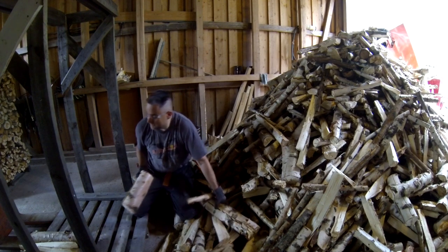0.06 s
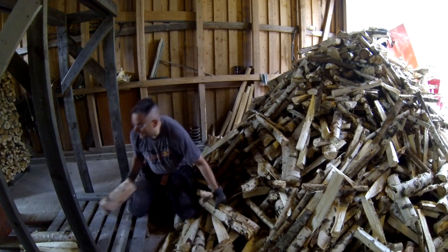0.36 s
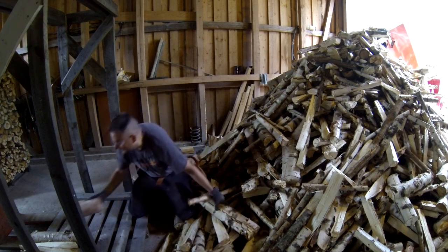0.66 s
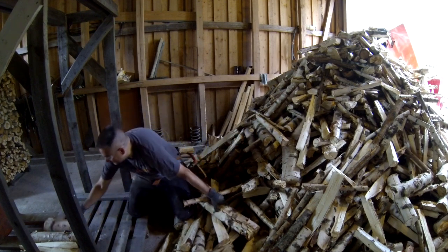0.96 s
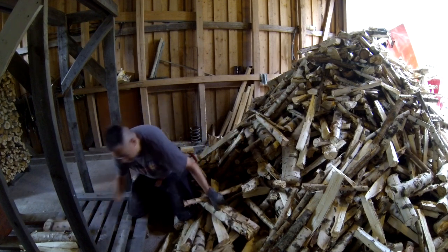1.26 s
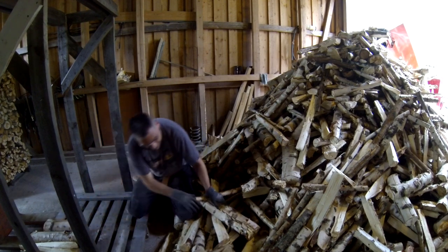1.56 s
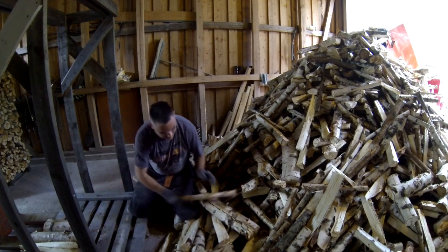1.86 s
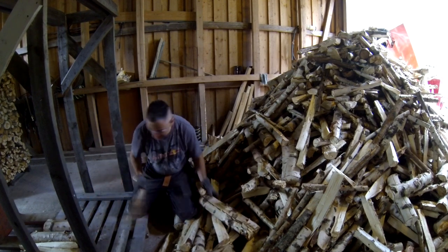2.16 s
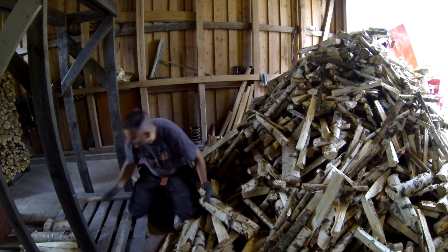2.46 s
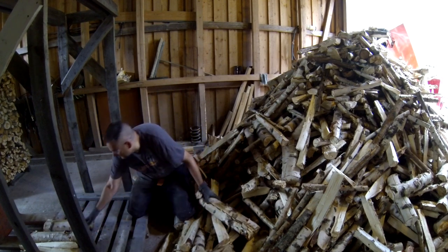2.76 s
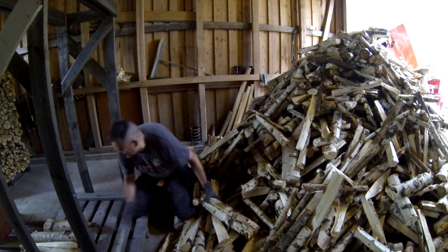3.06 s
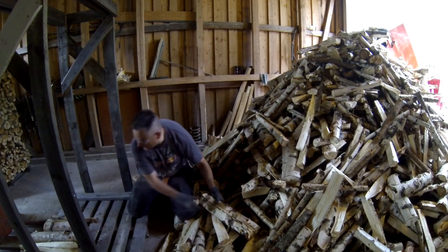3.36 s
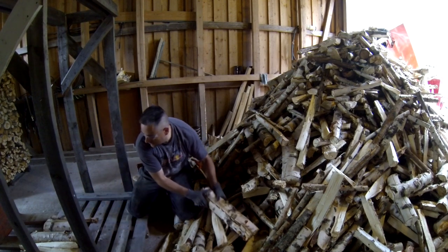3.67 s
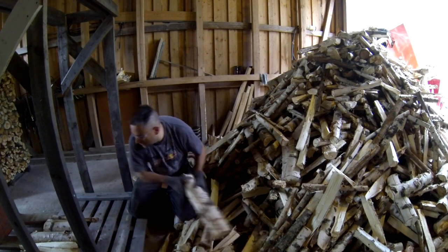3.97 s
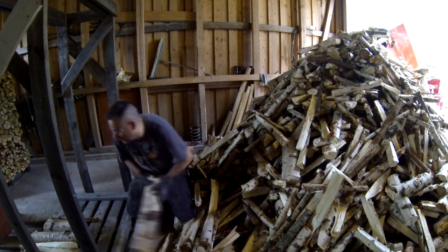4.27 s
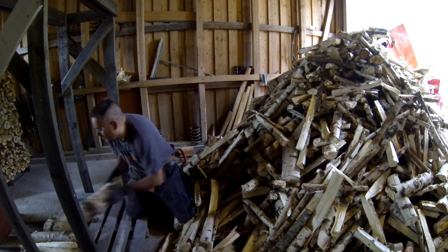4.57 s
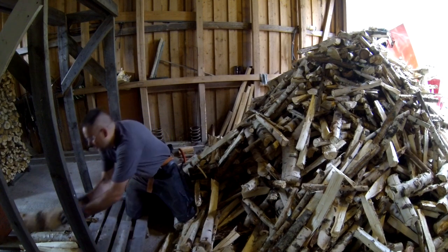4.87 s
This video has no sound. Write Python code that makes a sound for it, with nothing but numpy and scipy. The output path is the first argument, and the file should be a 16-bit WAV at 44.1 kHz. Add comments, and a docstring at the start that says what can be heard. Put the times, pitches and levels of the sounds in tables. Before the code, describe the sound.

In a wooden shed with a short reverberation, pieces of firewood knock against each other as they are laid on a pallet. The first heavy clunk booms and rattles briefly; after a pause with faint scrapes and taps come two more solid knocks close together, then a brighter clack with crackling bark. Gloves and bark rub quietly between the blows, heard over a very faint low hum of air.

```python
"""Stacking firewood in a shed

Split logs are taken from a heap and stacked on a wooden pallet. Each impact excites the damped
modes of a log and of the pallet booming under it, and crushes bark at the contact; two logs rock
to rest. Wood and gloves rub between the blows, and a few splinters snap. The plank shed answers
with echoes and reverberation, over a faint steady background."""
import sys
import numpy as np
from scipy import signal
from scipy.fft import rfft, irfft
from scipy.io import wavfile
from scipy.ndimage import uniform_filter1d

SR = 44100
rng = np.random.default_rng(int(sys.argv[2]) if len(sys.argv) > 2 else 0)


def int16_out(signal):
    """Quantize to a 16-bit WAV file."""
    q = np.round(np.clip(np.atleast_2d(signal).T, -1, 1) * 32767)
    wavfile.write(sys.argv[1], SR, q.astype(np.int16))


N = 221028
T = np.arange(SR) / SR  # t/s over the second that follows an onset


def amp(db):
    """Amplitude ratio of a level in decibels."""
    return 10 ** (np.asarray(db) / 20)


def unit(x):
    """Normalisation to rms 1."""
    return x / np.sqrt(np.mean(x ** 2) + 1e-20)


def interpolate(points, hz):
    """Linear interpolation on a logarithmic frequency axis."""
    f, value = np.transpose(points)
    return np.interp(np.log(hz + 1), np.log(f + 1), value)


def add(mix, t, sound):
    """Superposition of a sound at time t/s, which may lie before the start."""
    at = round(t * SR)
    sound = sound[max(-at, 0):]
    part = mix[max(at, 0):][:len(sound)]
    part += sound[:len(part)]


def colour(noise, spectrum):
    """Spectral shaping by (f/Hz, relative level/dB) points, at rms 1."""
    gain = amp(interpolate(spectrum, np.fft.rfftfreq(len(noise), 1 / SR)))
    return unit(irfft(rfft(noise) * gain, len(noise)))


def grains(per_s, spread_db):
    """Shot noise: one second of impulses of uneven strength at random moments."""
    strength = amp(spread_db * np.minimum(rng.exponential(1, SR), 4))
    return rng.standard_normal(SR) * strength * (rng.random(SR) < per_s / SR)


# spectrum of the background air: (f/Hz, relative level/dB)
AIR_SPECTRUM = [(20, 5.5), (42, -1), (57, 10.5), (80, 1.5), (150, -2), (300, -5.5), (600, -6), (850, -2.5),
                (1300, -14), (2200, -18.5), (3000, -18), (4800, -24.5), (8200, -26), (9000, -30),
                (13500, -32), (15500, -44)]
# a low hum and a faint whine: (f/Hz, level/dB)
STEADY_TONES = [(57.3, -60), (10750, -98.5)]
def background(air_db=-57, waver_hz=0.5):
    """Stationary noise, plus tones that waver by slow random frequency modulation."""
    drift = waver_hz * colour(rng.standard_normal(N), [(6, -4.0), (30, -62), (200, -120)])
    tones = sum(amp(db) * unit(np.sin(2 * np.pi * np.cumsum(hz + drift) / SR))
                for hz, db in STEADY_TONES)
    return amp(air_db) * colour(rng.standard_normal(N), AIR_SPECTRUM) + tones


# reverberation time of the shed: (f/Hz, T60/s)
SHED_DECAY = [(100, 0.746), (190, 0.54), (290, 0.66), (420, 0.61), (700, 0.47), (1840, 0.51), (4850, 0.39),
              (11000, 0.39)]
# early reflections off floor and walls: (delay/s, relative signed gain)
REFLECTIONS = [(.0062, 0.44), (0.018, -0.087), (0.0216, 0.19), (0.028, -0.03), (0.0477, .2), (0.053, 0.19)]
def in_shed(sound, tail_db, build_s=0.0037, echo_gain=0.3):
    """Convolution with a room impulse response: direct path, early reflections and diffuse tail."""
    hz, t, spectra = signal.stft(grains(5000, 0.91), SR, nperseg=1024)
    decay = amp(-60 * t / interpolate(SHED_DECAY, hz)[:, None])
    spectrum = rfft(signal.istft(spectra * decay, SR, nperseg=1024)[1][:SR])
    spectrum /= np.sqrt(uniform_filter1d(abs(spectrum) ** 2, size=70) + 1e-20)  # equal energy per Hz
    build_up = 1 - np.exp(-(T / build_s) ** 2)
    fade_out = np.minimum(1, 2 * (1 - T)) ** 2
    tail = irfft(spectrum, SR) * build_up * fade_out
    response = amp(tail_db) * tail / np.linalg.norm(tail)
    response[0] += 1
    for delay, gain in REFLECTIONS:
        response[round(delay * SR)] += echo_gain * gain
    return signal.fftconvolve(sound, response)


def ring(modes, contact_hz, radiate_hz, sign=1):
    """Sum of damped modes, peak 1: a soft contact dulls the high ones; slow motion radiates poorly."""
    motion = sum(sign ** k * amp(db - 60 * T / t60) * np.sin(2 * np.pi * hz * T)
                 for k, (hz, db, t60) in enumerate(modes))
    motion = signal.sosfilt(signal.butter(2, contact_hz, fs=SR, output="sos"), motion)
    sound = signal.sosfilt(signal.butter(2, radiate_hz, "high", fs=SR, output="sos"), motion)
    return sound / abs(sound).max()


# modes of each piece of wood and of the logs already stacked: (f/Hz, relative level/dB, T60/s)
WOOD_MODES = { "billet": [(310, -2.5, 0.076), (440.6, -4.5, 0.042), (608, -6.5, 0.029), (756, -1.5, 0.03),
              (884, -2.5, 0.038), (1012, -8, 0.035), (1155, -16.5, 0.051), (1283, -11.5, 0.026),
              (1439, -12, 0.028), (1760, -7.5, 0.012), (2830, -30, .012)], "stick": [(291.4, -10.5, 0.82),
              (338, -15.5, 0.05), (457, -3.5, 0.073), (618, -3.5, 0.071), (763, 4.5, 0.016),
              (960, -1.5, 0.06), (1061, -1, 0.025), (1630, -16.5, 0.032), (1910, -10, 0.03)],
              "stack": [(198.8, -8, 0.24), (269, -5, 0.13), (367, -5, 0.06), (451.7, -15, 0.14),
              (525, -4.5, 0.057), (616, -1.5, .03), (702.4, -1, 0.033), (840, -2.5, 0.045),
              (1030, -13, 0.028), (1280, -21, 0.037), (1436, -17, 0.015), (1870, -15.5, 0.017)],
              "birch": [(527, -12.5, 0.03), (770, 1.5, 0.049), (856, -1, .1), (908, -2, 0.067),
              (1151, -4.5, 0.048), (1320, -27.5, 0.027), (1640, -16.5, 0.019), (1860, -5, 0.055),
              (1987, -4.5, 0.018), (2610, -3.5, 0.0091), (2840, -35.5, 0.015), (3290, -8, 0.011),
              (4500, -19, 0.0069), (5140, -13.5, 0.015), (6930, -25, 0.0099)], "twig": [(830, 7, 0.035),
              (990, -20, 0.0067)], }
def wood_ring(piece, contact_hz, radiate_hz=295):
    """Free vibration of a log struck at one end: its far end moves with alternate sign, mode by mode."""
    return ring(WOOD_MODES[piece], contact_hz, radiate_hz, sign=-1)


# bark, gloves and sleeves sliding:
# (middle t/s, duration/s, relative rasp level/dB, piece rubbed, relative ring level/dB)
RUB_STROKES = [(0.061, 0.33, -54, "stick", -63), (0.851, 0.19, -75.5, "birch", -72),
               (1.816, 0.21, -56, "stick", -75), (2.257, 0.19, -59.5, "stick", -80.5),
               (3.678, 0.15, -55.5, "stack", -54.5), (3.817, 0.15, -65.5, "birch", -80),
               (3.974, .05, -44.5, "birch", -43), (4.001, 0.17, -46.5, "birch", -63),
               (4.935, 0.29, -58.5, "billet", -64.5)]
def rubbing(mix):
    """Stick-slip friction: tiny slips rasp and keep the wood ringing, swelling and fading."""
    for middle, duration, rasp_db, piece, wood_db in RUB_STROKES:
        slips = grains(2500, 5.9)
        resonance = wood_ring(piece, contact_hz=1884, radiate_hz=250)
        body = unit(signal.fftconvolve(slips, resonance)[:SR])
        pressure = np.sin(np.pi * np.minimum(T / duration, 1)) ** 2
        stroke = pressure * (amp(rasp_db) * rasp(slips) + amp(wood_db) * body)
        add(mix, middle - duration / 2, amp(-0.5) * in_shed(stroke, tail_db=-0.5))


# spectrum of sliding surfaces: (f/Hz, relative level/dB)
RASP_SPECTRUM = [(100, 2.5), (400, -14), (1000, 0.5), (1500, -9), (2200, -15), (3200, -14.5), (5500, -23),
                 (8000, -34.5), (15000, -37)]
def rasp(slips):
    """Roughness noise: the slips as heard from the surface itself."""
    return colour(slips, RASP_SPECTRUM)


# spectrum of a breaking splinter: (f/Hz, relative level/dB)
SPLINTER_SPECTRUM = [(1000, 7), (3000, -9.5), (5000, -3), (7000, -8), (10000, -10), (15000, -13.5)]
# splinters breaking: (t/s, level/dB)
SPLINTER_SNAPS = [(0.795, -48), (0.9923, -41), (1.0125, -40), (4.657, -45.5), (4.67, -45.5)]
def splinters(mix, t60=0.0091):
    """Brittle fracture: each splinter breaks with a thin, bright tick."""
    for t, db in SPLINTER_SNAPS:
        tick = amp(db - 60 * T / t60) * colour(grains(8800, 2.8), SPLINTER_SPECTRUM)
        add(mix, t, in_shed(tick, tail_db=1))


# spectrum of crushed bark: (f/Hz, relative level/dB)
BARK_SPECTRUM = [(200, 8.5), (900, 13.5), (1800, 10), (2300, -1.5), (2900, 9), (4000, 0.5), (5200, -1),
                 (6500, -12), (10000, -14.5), (15000, -23.5)]
def bark_crackle(contact_hz, crush_s=0.0018, t60=0.041):
    """Acoustic emission: bark gives way in tiny fractures as load builds; a soft contact muffles it."""
    crush = amp(-60 * T / t60) * (1 - np.exp(-T / crush_s))
    fractures = colour(grains(6000, 4), BARK_SPECTRUM)
    muffle = signal.butter(1, min(3 * contact_hz, SR / 3), fs=SR)
    return signal.lfilter(*muffle, crush * fractures)


# modes of the loaded pallet: (f/Hz, relative level/dB, T60/s)
PALLET_MODES = [(62, -19, 0.076), (96, -20, 0.2), (129, -27, 0.27), (198.2, -6.5, 0.093),
                (228.6, -3.5, 0.068), (271, -2, 0.12), (284, -8, .28), (330, -5, 0.077), (370, -19.5, 0.44),
                (446, -18.5, 0.26), (512, -42, 0.13)]
def pallet_boom():
    """Structure-borne sound: the weight of a log excites the low modes of its support."""
    return ring(PALLET_MODES, contact_hz=478, radiate_hz=112.6)


# reverberant tail against direct sound, from where each piece lies: {piece: level/dB}
TAIL_LEVELS = {"billet": 1, "stick": -1.7, "stack": -3.5, "birch": -2, "twig": -14}
def impact(piece, wood_db, contact_hz, pallet_db, bark_db):
    """Impulsive excitation: one blow rings the log, shakes the pallet and crushes bark."""
    wood = amp(wood_db) * wood_ring(piece, contact_hz)
    pallet = amp(pallet_db) * pallet_boom()
    bark = amp(bark_db) * bark_crackle(contact_hz)
    return (in_shed(wood, TAIL_LEVELS[piece], build_s=0.0068)
            + in_shed(pallet, tail_db=-1.15, build_s=0.0049, echo_gain=0.58)
            + in_shed(bark, TAIL_LEVELS[piece] + 1.6, build_s=0.0068))


# logs rocking to rest: (landing t/s, piece, first gap/s, first knock's wood, pallet, bark level/dB)
ROCKING_LOGS = [(1.0138, "billet", .0355, -22.5, -16, -41.5), (2.8333, "stick", .041, -23.5, -20, -40.5)]
def rocking(mix, knocks=3, gap_growth=1.35, contact_hz=950):
    """Damped rocking: a log tips from edge to edge on the slats, each knock later and weaker."""
    wood_fall_db, pallet_fall_db, bark_fall_db = 1.5, 3.5, 2.5  # per knock
    for t, piece, gap, wood_db, pallet_db, bark_db in ROCKING_LOGS:
        for k in range(knocks):
            t += gap * gap_growth ** k
            knock = impact(piece, wood_db - k * wood_fall_db, contact_hz,
                           pallet_db - k * pallet_fall_db, bark_db - k * bark_fall_db)
            add(mix, t, knock)


# wood striking wood: (t/s, piece, wood level/dB, contact cutoff f/Hz, pallet level/dB, bark level/dB)
LOG_BLOWS = [ (0.070, "stack", -36, 960, -40, -68), (0.27, "twig", -49, 1200, -77, -58),
             (0.796, "birch", -56, 2600, -47.5, -47.5), (0.9885, "billet", -17, 1900, -21.5, -32),
             (0.991, "billet", -11, 2400, -17.5, -28.5), (1.0091, "billet", -5, 1090, -33.5, -36.5),
             (1.0137, "stack", -10, 576, 1, -35), (1.788, "stick", -30.5, 1390, -39, -51),
             (1.934, "stick", -47, 910, -40.5, -50), (2.078, "twig", -42, 1194, -67, -76.5),
             (2.801, "billet", -25, 2090, -53.5, -42), (2.8070, "stick", -30, 600, -18, -75),
             (2.8335, "stick", -11, 1400, -18, -43.5), (2.848, "stack", -16, 498, -11.5, -52),
             (3.119, "stack", -1.5, 775, -32, -42), (3.1249, "stack", -13, 338, -15, -62),
             (3.602, "stack", -37, 399, -38, -78), (3.651, "stack", -39.5, 890, -70, -69),
             (4.0487, "birch", -19, 5200, -65, -23), ]
def stacking(mix):
    """Collisions of the handled logs: the harder the contact, the higher its cutoff frequency."""
    for t, *blow in LOG_BLOWS:
        add(mix, t, impact(*blow))


def scene():
    """Linear superposition of the handling sounds on the background, in one channel."""
    mix = background()
    stacking(mix)
    rocking(mix)
    rubbing(mix)
    splinters(mix)
    return mix[None]


def record(dry, edge_hz=15300):
    """Clipping at full scale, then band limiting by a linear-phase low-pass filter."""
    lowpass = signal.firwin(511, edge_hz, window=("kaiser", 9), fs=SR)
    return signal.oaconvolve(np.clip(dry, -1, 1), lowpass[None], "same")


dry = scene()
out = record(dry)
int16_out(out)
```